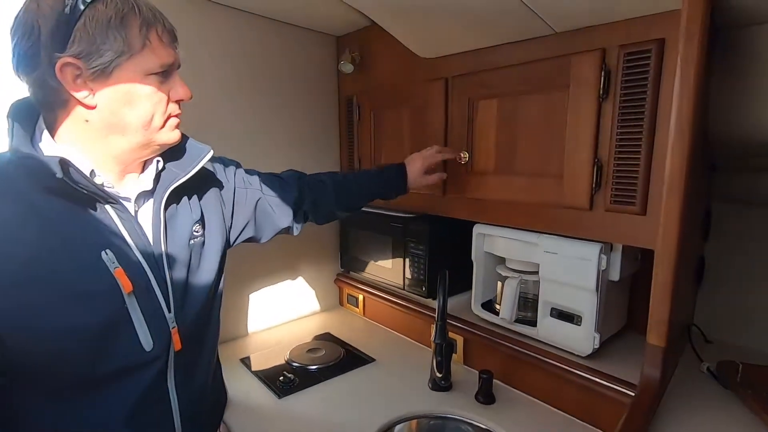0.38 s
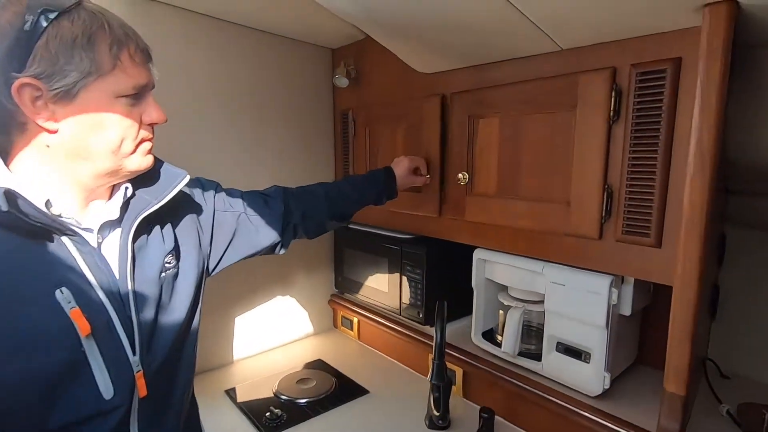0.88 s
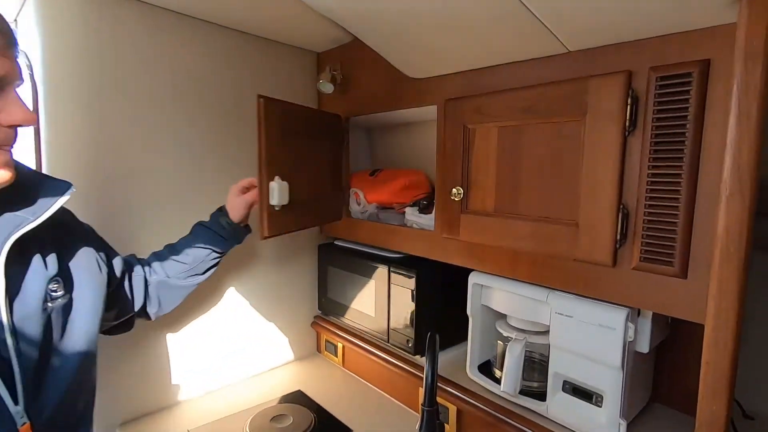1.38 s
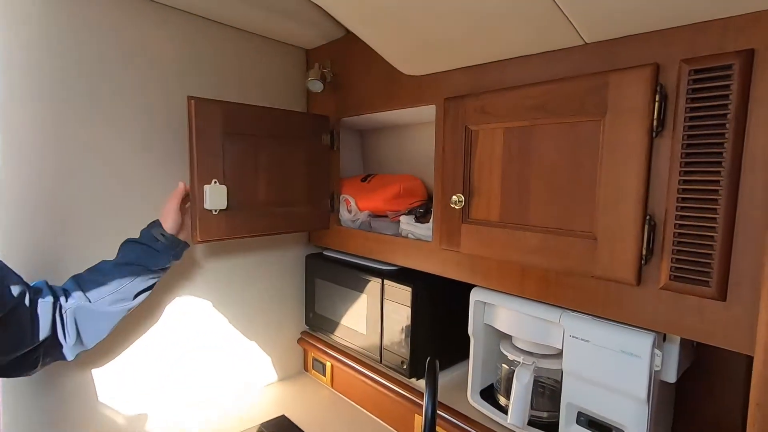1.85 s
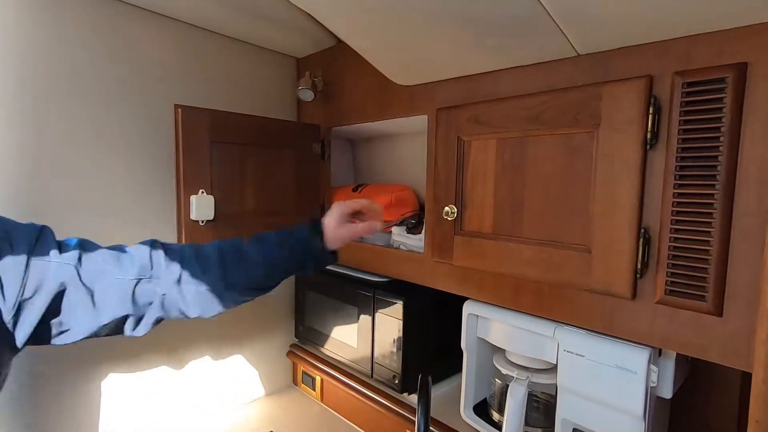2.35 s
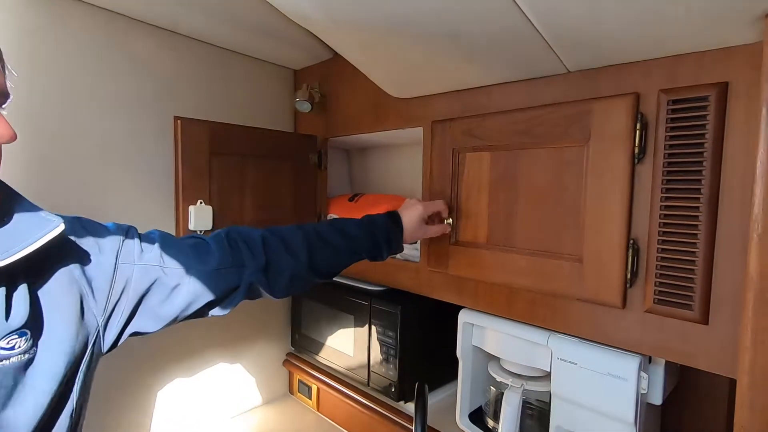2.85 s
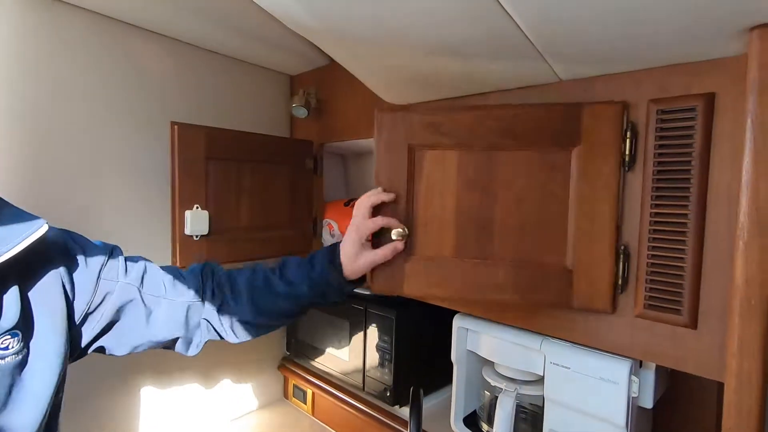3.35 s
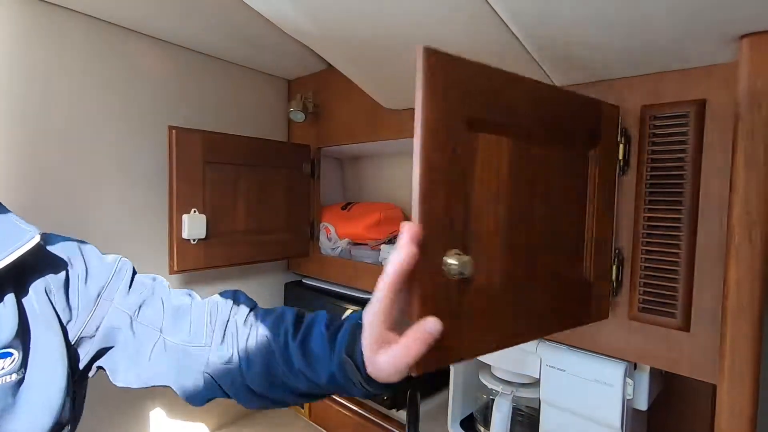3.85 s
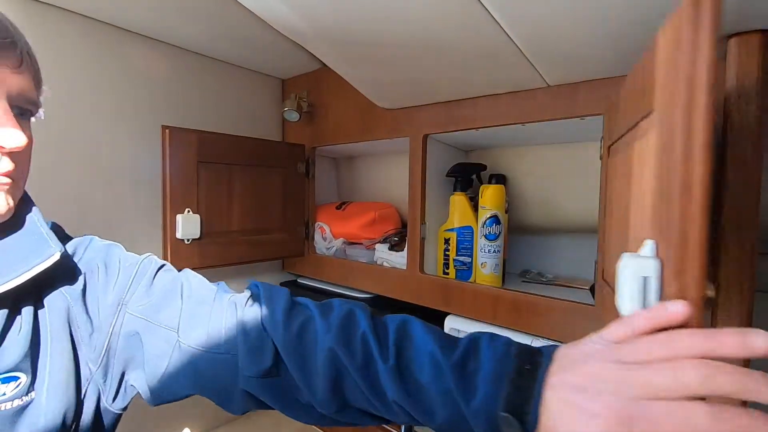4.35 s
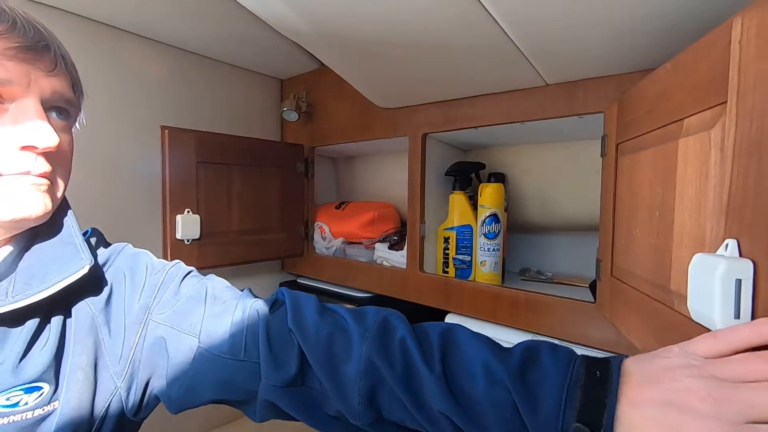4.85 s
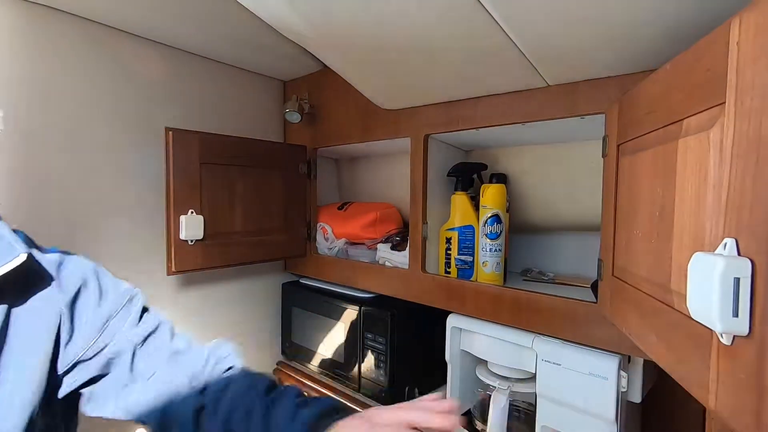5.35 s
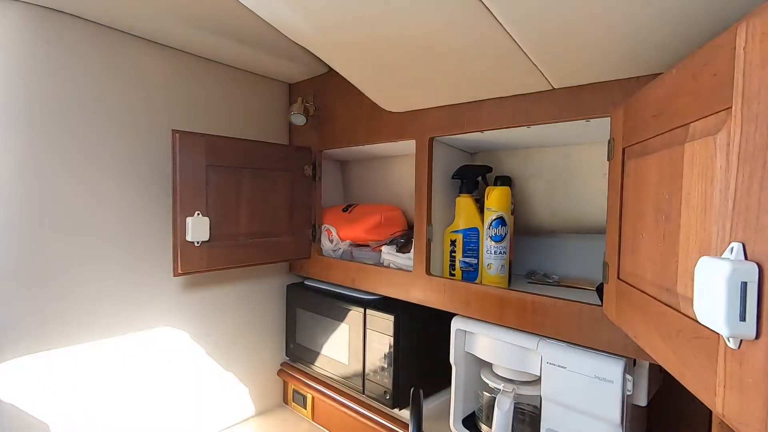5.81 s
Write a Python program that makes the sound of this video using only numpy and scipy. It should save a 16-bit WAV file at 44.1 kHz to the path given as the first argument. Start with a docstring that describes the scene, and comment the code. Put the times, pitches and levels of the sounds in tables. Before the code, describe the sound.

Close, slightly left-leaning clicks and knocks from plastic catches and wooden cupboard doors: a dense cluster at the start, a quieter gap, two separate snaps midway, small ticks, then a low thud and a hard bright clack at the end. Short cabin echo surrounds them. Cloth rustles faintly, while deep unsteady hum and hull rumble run underneath. Compact stereo microphone with limited top treble.

```python
"""Wooden cupboard doors in a boat cabin: plastic catches click and rattle, doors knock, in a small hard room.
Gritty bursts of noise ring the catch, the door and the bright plastic edge; soft thuds ring the woodwork.
A jacket sleeve rustles as the arm moves: a smooth dull noise and a slightly patchy bright noise.
Behind them a narrow low hum near 45 Hz wavers at random, with a thin whine, over a steady hull rumble."""
import sys
import numpy as np
from scipy import signal
from scipy.fft import rfft, irfft, next_fast_len
from scipy.io import wavfile
from scipy.ndimage import uniform_filter1d, map_coordinates

SR = 44100
rng = np.random.default_rng(int(sys.argv[2]) if len(sys.argv) > 2 else 0)


def to_linear_factor(level_db):
    """Convert decibel levels (scalar or array-like) to linear amplitude factors."""
    exponent = np.asarray(level_db, float) / 20
    return 10 ** exponent


def file_out(sig):
    """Save sig as 16-bit WAV at sys.argv[1]."""
    # one column per channel
    cols = np.atleast_2d(sig).T
    # limit, then scale
    lim = np.clip(cols, -1, 1)
    pcm = np.round(lim * 32767).astype(np.int16)
    wavfile.write(sys.argv[1], SR, pcm)


N = 262395  # length of the scene in samples

# blows between catch and door, peaks before a slight tilt to the left:
# (time [s], click peak [dB], knock peak [dB], tick peak [dB], contact length [ms])
CONTACTS = [(.052, -34.5, -35, -59, 5.8), (.085, -27.5, -32, -33, 6.6), (.102, -32, -31, -38, 2.3),
            (.118, -28.5, -40, -36, 1.06), (.178, -35.5, -58, -41, 1.7), (.191, -39, -39, -52, 3.5),
            (.2508, -36.5, -41, -55, 0.47), (0.351, -36, -43, -48, 5.1), (.3586, -33, -25, -37, 6.2),
            (0.3647, -25.5, -33.5, -34, 16), (.377, -19.5, -18.5, -25, 5.3),
            (0.3922, -25.5, -40, -22.5, 5.7), (.4035, -15, -29.5, -41, 3.37), (0.4102, -18, -34, -46, 3.5),
            (.4863, -32, -47, -41, 0.9), (.631, -33.5, -45, -33, 7.4), (.843, -35, -46, -48, 4.1),
            (.9602, -58, -49, -42, 3.2), (2.9217, -52, -50, -49, 2.7), (2.9404, -23, -27, -30.5, 3.64),
            (2.9949, -37.5, -53, -54, 2.17), (3.1843, -47, -50, -49, 6), (3.2277, -34, -40, -42.5, 4.4),
            (3.255, -47.5, -60, -45.5, 12.6), (3.4465, -20, -32.5, -51, 5), (3.79, -42.5, -63, -63, 28),
            (4.366, -47, -41, -65, 6.5), (4.535, -42, -58, -47, 14.8), (4.9483, -32, -65, -20.5, 2.03),
            (4.9523, -53, -56, -22, 1.7), (4.962, -38.5, -57, -30.5, 12.8), (5.362, -39, -38, -70, 3.83),
            (5.4285, -30.5, -27, -62, 5.3), (5.4417, -39, -45, -62, 15.7), (5.472, -56, -37, -62, 6.5),
            (5.5402, -37.5, -56, -45, 12), (5.6042, -15, -26, -16.5, 2.36), (5.6083, -15, -27, -29, 8.1),
            (5.6266, -20.5, -31.5, -28, 5.15), (5.645, -30.5, -55, -34.5, 16.6),
            (5.7584, -53, -63, -44, 3.35), (5.8351, -38.5, -51, -47.5, 6)]
# short resonances of the plastic catch: (frequency [Hz], width [Hz], relative level [dB])
CATCH_MODES = [(1206, 300, 2), (1620, 520, -9), (1634, 28, -12), (2002, 340, 0), (2184, 64, 3),
               (2420, 510, -10), (2976, 167, 6), (3170, 400, 2), (4260, 2700, -9.5)]
# short resonances of the door panel: (frequency [Hz], width [Hz], relative level [dB])
DOOR_MODES = [(394, 62, -4), (518, 50, 1), (648, 164, -0.5), (743, 84, 2.5), (821, 82, -2.5), (992, 95, -2),
              (1158, 42, 0)]
# resonances of the bright plastic edge: (frequency [Hz], width [Hz], relative level [dB])
TICK_MODES = [(4760, 1500, -3.5), (5840, 580, 3), (6410, 660, 1.5), (7700, 1340, 0), (8760, 880, 3.5),
              (9550, 1960, -3)]
# how far the left microphone port leads the right: (frequency [Hz], phase [radians])
PORT_LEAD = [(600, 0), (1100, -.9), (2200, -.7), (4000, .1), (5500, 1.1), (7500, 1.6), (9000, 2.0),
             (11000, 2.4)]
# how fast the cabin's echo dies, as the time to fall 60 dB: (frequency [Hz], decay time [s])
CABIN_DECAY = [(300, 0.25), (1300, 0.1), (3500, 0.16), (9000, 0.15)]
# left-right likeness of the cabin's echo: (frequency [Hz], likeness [0-1])
ECHO_LIKENESS = [(300, .97), (600, .88), (1100, .5), (3000, .65), (6000, .4), (10000, 0)]
# soft low blows into the woodwork: (time [s], level [dB], pitch of the part struck [Hz])
THUDS = [(.1, -23, 140), (.37, -16, 122), (.42, -20.5, 218), (.45, -23, 150), (2.943, -26.5, 170),
         (2.942, -33.5, 506), (3.449, -34, 645), (5.431, -33, 75), (5.474, -11, 85.7), (5.482, -22.5, 242)]
# low modes of the woodwork: (frequency [Hz], relative level [dB], time to fall 60 dB [s])
WOODWORK_MODES = [(75, 1, 0.17), (115.5, -1, 0.2), (150, -0.5, 0.18), (235.3, 0, 0.13), (340, -1, 0.081),
                  (508, 3, 0.066), (645, 2, .11)]
# the sleeve's movements: (time [s], dull rustle level [dB], bright level over dull [dB])
SLEEVE_MOVES = [(0, -52.5, -5.5), (.16, -50.5, -6.5), (.32, -57, -4), (.7, -54.5, -3.5), (1.19, -53.5, -1),
                (1.72, -53.5, -2), (2.04, -55.5, -4.5), (2.53, -51.5, -8.5), (2.95, -55, -12.5),
                (3.1, -56.5, -7.5), (3.45, -55.5, -5.5), (3.84, -56.5, -6.5), (4.3, -53.5, -7.5),
                (4.9, -58.5, -8), (5.2, -55, -7), (5.57, -54, -6), (5.68, -48.5, -7.5), (5.83, -55.5, -4.5),
                (5.95, -55.5, -7)]
# colour of the dull rustle: (frequency [Hz], relative level per Hz [dB])
DULL_COLOUR = [(300, -25), (700, -3.5), (1500, 1.5), (3000, -3), (4500, -7.5), (6500, -15), (9000, -55.5)]
# colour of the bright rustle: (frequency [Hz], relative level per Hz [dB])
BRIGHT_COLOUR = [(1500, -41), (3500, -12.5), (5500, -1.5), (8000, 0.5), (9800, 1), (10500, -8)]
# random wavering of a narrow low hum near 45 Hz: one chance draw of level and pitch, typed in:
# (time [s], level [dB], length [s], pitch [Hz])
HUM_WAVERING = [(0.196, -30.5, 0.054, 52.2), (.4, -30, .15, 45), (.7, -27.5, .25, 43.95),
                (1.203, -29, 0.41, 44.02), (1.5, -28, 0.21, 44.1), (1.68, -27.5, 0.086, 46.4),
                (2.032, -25.5, .2, 43.56), (2.318, -24.5, 0.098, 45), (2.57, -31, .15, 42),
                (3.027, -25, 0.075, 44.8), (3.33, -30, 0.096, 41.9), (3.44, -33, 0.056, 46),
                (3.741, -22.5, 0.11, 46.54), (4.29, -29.5, 0.27, 45), (4.603, -37.5, 0.062, 55),
                (5.04, -24.5, 0.12, 48.9), (5.32, -28.5, .14, 46.45), (5.45, -27, 0.063, 47),
                (5.865, -28.5, 0.12, 44.1)]
# colour of the hull rumble: (frequency [Hz], relative level per Hz [dB])
RUMBLE_COLOUR = [(15, -33), (26, 0), (34, -6.5), (60, 0), (95, -13), (160, -14), (300, -22), (500, -29.5),
                 (900, -39), (2000, -72.5)]
# hull and cabin resonances on the rumble: (frequency [Hz], width [Hz], level over the rumble colour [dB])
HULL_MODES = [(64, 7.8, 2), (130.9, 13, 10.5), (196, 33, 6.5), (251.6, 27, 2), (294, 32, 3),
              (410, 14.9, 11.5), (529, 16, 4), (588.3, 17.2, 10)]
# left-right likeness of rumble and rustle: (frequency [Hz], likeness [0-1])
NOISE_LIKENESS = [(60, 0.97), (140, 1), (330, 0.96), (780, 0.59), (1840, 0.29), (4340, 0.77), (10200, 0)]
# treble limit, a steep drop above 10.3 kHz and a faint shelf up to 15 kHz: (frequency [Hz], gain [dB])
TREBLE_LIMIT = [(10300, -1), (10900, -11.5), (11500, -12), (14800, -11), (15200, -55.5)]


def unit(x):
    """Scales a signal to rms 1."""
    return x / np.sqrt(np.mean(x ** 2) + 1e-20)


def along(points, hz):
    """Reads a (frequency, value) table at any frequency, on a log axis."""
    f, values = np.transpose(points)
    return np.interp(np.log(hz + 1), np.log(f + 1), values)


def wobble(rate):
    """A smooth random curve through `rate` random points a second."""
    points = rng.standard_normal(int(N * rate / SR) + 4)
    return map_coordinates(points, [np.arange(N) * rate / SR])


def filtered(x, response):
    """Filters x by a response (complex if need be) given as a function of frequency."""
    size = next_fast_len(x.shape[-1] + 8192)  # spare room for the ringing
    spectrum = rfft(x, size) * response(np.fft.rfftfreq(size, 1 / SR))
    return irfft(spectrum, size)[..., :x.shape[-1]]


def resonances(table):
    """The response of a set of ringing modes, with signs that alternate from row to row."""
    def response(f):
        total = 0
        for k, (centre, width, db) in enumerate(table):
            mode = 1j * f * width / (centre ** 2 - f ** 2 + 1j * f * width)
            total = total + (-1) ** k * to_linear_factor(db) * mode
        return total
    return response


def spread_stereo(two, gain, likeness):
    """Mixes two independent noises so that left and right are as alike as the table says."""
    def share(hz):
        turn = np.arccos(np.clip(along(likeness, hz), -1, 1)) / 2
        return gain(hz) * np.array([np.cos(turn), np.sin(turn)])
    mid, side = filtered(two, share)
    return np.array([mid + side, mid - side])


def coloured_noise(gain, patchy_db):
    """Stereo noise of rms 1; patchy_db sets how uneven it is in time and frequency (0 is smooth)."""
    z = signal.stft(rng.standard_normal((2, N)), nperseg=512)[2]
    field = uniform_filter1d(rng.standard_normal(z.shape[1:]), size=6, axis=0)
    field = uniform_filter1d(field, size=10, axis=1)
    two = signal.istft(z * to_linear_factor(patchy_db * unit(field)), nperseg=512)[1][:, :N]
    return unit(spread_stereo(two, gain, NOISE_LIKENESS))


def contact_forces(life, t):
    """Three gritty bursts of noise; long contacts are soft and rise slowly."""
    grit = rng.standard_normal((3, len(t))) * to_linear_factor(1.94 * rng.standard_normal(len(t)))
    return grit * np.exp(-t / life) * (1 - np.exp(-t / (4 * life ** 2)))


def struck_bodies(knock_db, tick_db):
    """Catch, door and plastic edge; where the blow lands decides which catch modes answer most."""
    scatter = lambda: rng.normal(0, 1.5)  # dB
    # the click's centre rises as tick outweighs knock: one octave for every 58 dB
    centre_hz = 1970 * 2 ** ((tick_db - knock_db) / 58)
    catch = [(hz, w, db - 4 * np.log2(hz / centre_hz) ** 2 + scatter()) for hz, w, db in CATCH_MODES]
    catch.append((centre_hz, 1.3 * centre_hz, -6))  # the broad crack of the contact itself
    door = [(hz, w, db + scatter()) for hz, w, db in DOOR_MODES]
    # wood swallows the click's treble
    damped_catch = lambda hz: resonances(catch)(hz) / (1 + 1j * hz / 4800) ** 2
    return damped_catch, resonances(door), resonances(TICK_MODES)


def cabin(x):
    """The room's echo: a fresh two-channel noise tail in which each frequency dies at its own speed."""
    hz, t, z = signal.stft(rng.standard_normal((2, SR // 3)), SR, nperseg=256)
    fade = to_linear_factor(-60 * t / along(CABIN_DECAY, hz)[:, None])
    tail = signal.istft(z * fade, SR, nperseg=256)[1]
    tail = spread_stereo(tail, np.ones_like, ECHO_LIKENESS)
    delayed = np.pad(x, (round(.003 * SR), 0))
    return signal.fftconvolve(delayed[None], tail / np.linalg.norm(tail[0]), axes=1)


def contacts():
    """Each contact is a gritty burst that rings catch, door and the bright plastic edge, then the cabin."""
    out, t = np.zeros((2, N + SR)), np.arange(SR // 5) / SR
    for s, click_db, knock_db, tick_db, contact_ms in CONTACTS:
        life = contact_ms / 1000
        bodies = struck_bodies(knock_db, tick_db)
        blow, colour = 0, 0
        for force, body, db in zip(contact_forces(life, t), bodies, (click_db, knock_db, tick_db)):
            # the body driven by the grit, and by one clean impulse
            ring, even = filtered(np.array([force, t == 0]), body)
            ring *= to_linear_factor(db) / np.abs(ring).max()
            blow = blow + ring
            colour = colour + even * np.linalg.norm(ring) / np.linalg.norm(even)
        # the two microphone ports hear the direct blow with different phase
        near = filtered(blow, lambda hz: np.exp([[.5j], [-.5j]] * along(PORT_LEAD, hz)))
        # the walls hear the blow from all sides, so its chance colours even out
        heard = to_linear_factor(-2.0) * cabin(np.roll(colour, round(life * SR)))
        heard[:, :len(t)] += near
        out[:, round(s * SR):][:, :heard.shape[1]] += heard
    return out[:, :N] * to_linear_factor([[.6], [-.6]])  # slightly to the left


def thuds():
    """A soft push rings the woodwork's modes, most of all those near the part struck."""
    out, t = np.zeros(N + SR), np.arange(SR // 2) / SR
    soft_start = 1 - np.exp(-t / 0.0053)
    for s, db, struck_hz in THUDS:
        ring = 0
        for hz, level, t60 in WOODWORK_MODES:
            reach_db = -12.5 * np.log2(hz / struck_hz) ** 2  # 12.5 dB lost at one octave away
            ring = ring + to_linear_factor(level + reach_db - 60 * t / t60) * np.sin(2 * np.pi * hz * t)
        out[round(s * SR):][:len(t)] += to_linear_factor(db) * soft_start * ring
    return out[:N]


def sleeve():
    """Cloth rustle: a smooth dull noise and a slightly patchy bright noise that rise and fall together."""
    s, *levels = np.transpose(SLEEVE_MOVES)
    rustle_db, bright_db = [np.interp(np.arange(N) / SR, s, level) for level in levels]
    folds_db = .6 * wobble(12)  # both follow the folds of the cloth
    dull = coloured_noise(lambda hz: to_linear_factor(along(DULL_COLOUR, hz)), patchy_db=0.0)
    bright = coloured_noise(lambda hz: to_linear_factor(along(BRIGHT_COLOUR, hz)), patchy_db=1.0)
    return to_linear_factor(rustle_db + folds_db) * dull + to_linear_factor(rustle_db + bright_db + folds_db) * bright


def hum():
    """A narrow low hum near 45 Hz whose level and pitch waver at random, and a thin whine."""
    t = np.arange(N) / SR
    floor = to_linear_factor(-34.5 + 2 * wobble(14)) ** 2  # power of the hum at its weakest
    power, pull = floor, floor * (46 + 3 * wobble(6))  # the floor's pitch drifts around 46 Hz
    for s, db, length, hz in HUM_WAVERING:
        bump = to_linear_factor(db) ** 2 * np.exp(-(2 * (t - s) / length) ** 2)
        power = power + bump
        pull = pull + bump * hz
    pitch = pull / power + 1.46 * wobble(11)  # average pitch, weighted by power
    low = np.sqrt(power) * np.sin(2 * np.pi * np.cumsum(pitch) / SR)
    whine_hz = 883 + 3 * wobble(11)
    whine = to_linear_factor(-67.5 + 2.1 * wobble(5.1)) * np.sin(2 * np.pi * np.cumsum(whine_hz) / SR)
    # the whine leans left; a sine needs a peak of sqrt(2) for rms 1
    return np.sqrt(2) * (low + whine * to_linear_factor([[2.5], [-2.5]]))


def hull_rumble():
    """Steady low noise, made stronger at the resonances of hull and cabin."""
    def colour(hz):
        peaks = sum(to_linear_factor(db) ** 2 / (1 + (2 * (hz - c) / w) ** 2) for c, w, db in HULL_MODES)
        return to_linear_factor(along(RUMBLE_COLOUR, hz)) * np.sqrt(1 + peaks)
    return to_linear_factor(-31 + 0.3 * wobble(3.01)) * coloured_noise(colour, patchy_db=1.03)


def scene():
    """Everything in the cabin, added together."""
    return contacts() + thuds() + sleeve() + hum() + hull_rumble()


def low_pass(x):
    """Removes everything above the highest recorded frequency."""
    return signal.sosfilt(signal.butter(12, 15150, fs=SR, output="sos"), x)


def record(dry):
    """The whole mix loses its top treble: a steep drop above 10.3 kHz, a faint shelf up to 15 kHz."""
    mix = filtered(dry, lambda hz: to_linear_factor(along(TREBLE_LIMIT, hz)))
    return low_pass(mix)


dry = scene()
out = record(dry)
file_out(out)
```